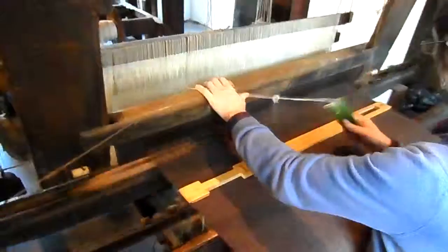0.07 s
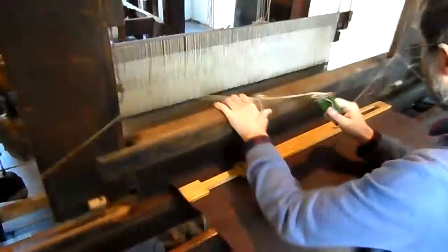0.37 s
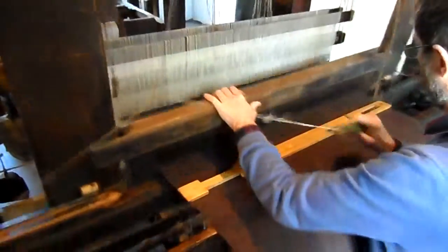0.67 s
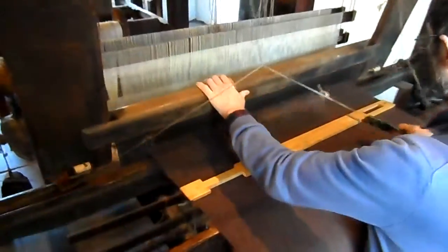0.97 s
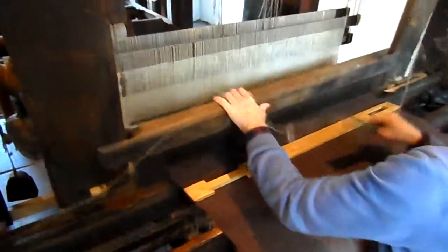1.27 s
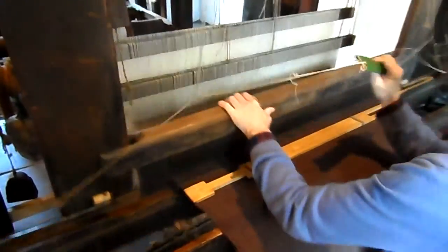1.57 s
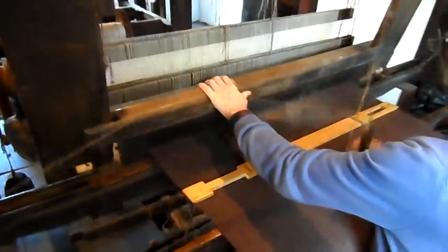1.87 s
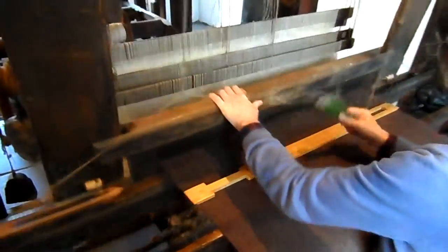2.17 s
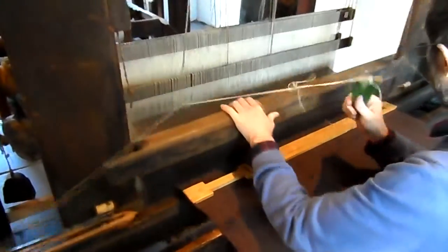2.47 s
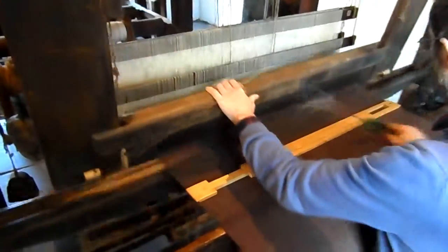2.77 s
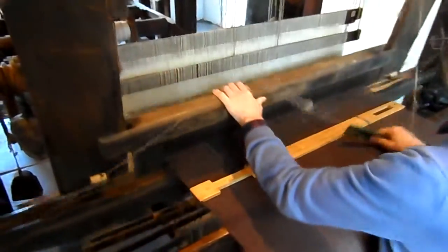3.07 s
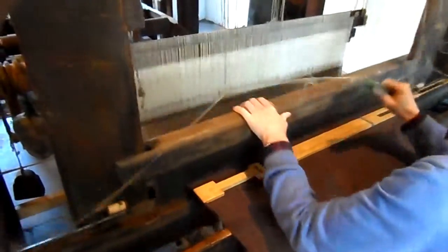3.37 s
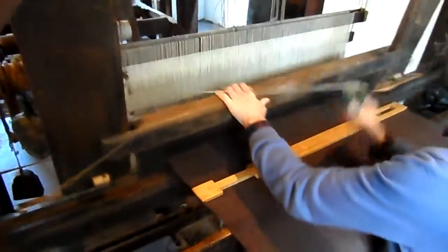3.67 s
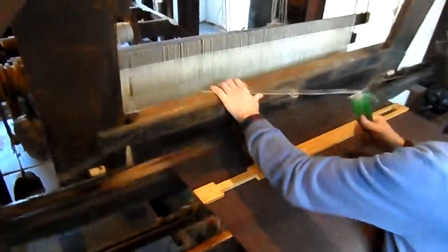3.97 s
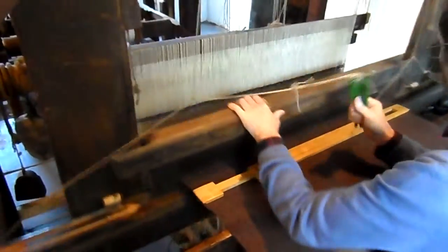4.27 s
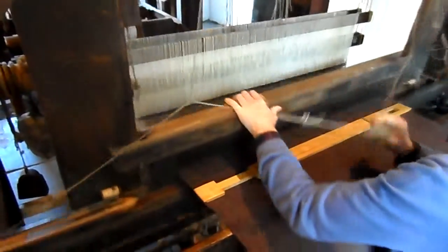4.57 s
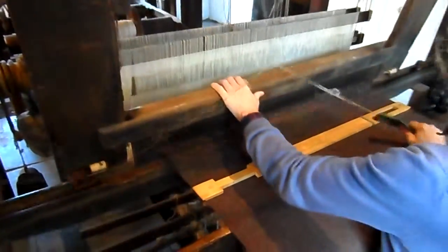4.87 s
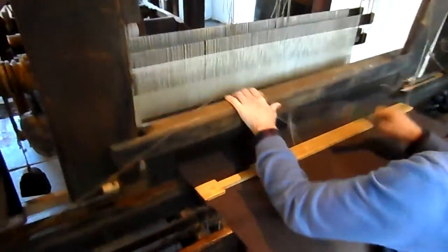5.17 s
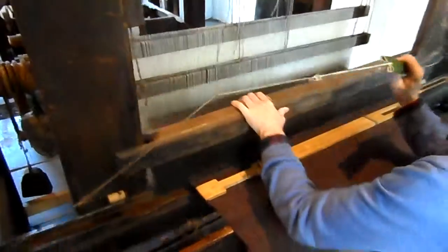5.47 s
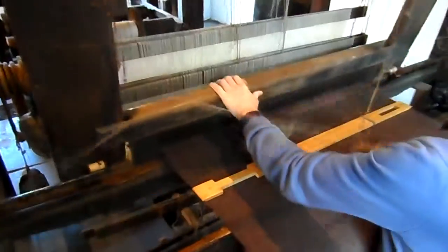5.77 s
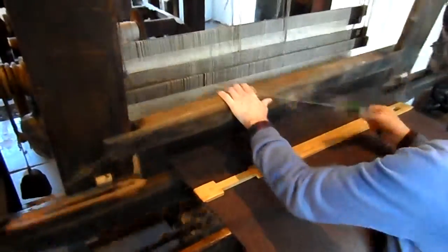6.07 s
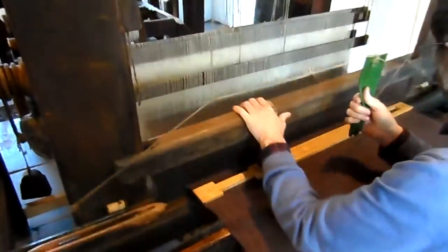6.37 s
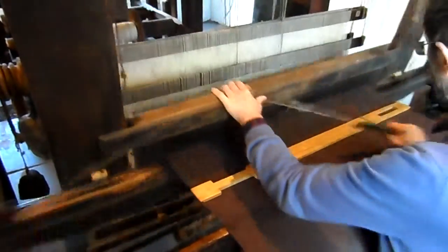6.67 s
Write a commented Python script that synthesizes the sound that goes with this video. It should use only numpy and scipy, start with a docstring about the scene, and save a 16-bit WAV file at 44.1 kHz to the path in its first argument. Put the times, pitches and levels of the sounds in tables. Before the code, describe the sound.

A wooden hand loom clacks about once a second, with thudding treadles, a sliding shuttle and brief squeaks in a small workshop.

```python
"""A small workshop, close to a wooden fly-shuttle hand loom worked about once a second.
Each cycle the treadles thud and boom through the floor, links knock and dry joints squeak.
The cord jerks the picker, the shuttle slides along its race and clacks into its box,
and the swinging beam beats the weft home. Heddles tick and threads rustle over a low room rumble."""
import sys
import numpy as np
from scipy import signal
from scipy.fft import rfft, irfft, next_fast_len
from scipy.io import wavfile
from scipy.ndimage import uniform_filter1d

SR = 44100
rng = np.random.default_rng(int(sys.argv[2]) if len(sys.argv) > 2 else 0)


def materialize(psi):
    """Save the field psi as 16-bit PCM at rate SR to the path in sys.argv[1].

    A 1-D psi becomes a single channel; in a 2-D psi each row is a channel.
    """
    bounded = np.clip(np.atleast_2d(psi).T, -1, 1)
    quanta = np.round(bounded * 32767).astype(np.int16)
    wavfile.write(sys.argv[1], SR, quanta)


N = 301203
TIME_S = np.arange(N) / SR
AGE_S = np.arange(SR // 2) / SR  # time since a blow

# room decay: f/Hz, t60/s
ROOM_DECAY = [(100, 0.65), (500, 0.48), (2500, 0.45), (6000, 0.4), (15000, 0.32)]
# spectral shapes: f/Hz, level/dB
ROOM_SPECTRUM = [(10, -4), (25, -0.5), (40, -13), (55, -2.5), (90, -11), (200, -18.5), (1000, -19.5),
                 (5000, -26), (16000, -46)]
FLOOR_SPECTRUM = [(20, -5), (38, -3), (54, -29), (70, 7), (85, -18), (130, -34), (400, -37)]
FRAME_SPECTRUM = [(40, -28.5), (90, -7), (130, -10), (180, -4), (300, -3.5), (420, -3), (650, -4.5),
                  (1200, -33.5), (4000, -69)]
RACE_SPECTRUM = [(250, -22), (600, 1), (950, 1.5), (1700, 2.5), (2800, -3.5), (4500, -13), (7000, -28),
                 (16000, -31)]
THREAD_SPECTRUM = [(1500, -26), (4000, 7), (7000, -0.5), (11000, -4.5), (14000, -6), (16000, -5.5)]
HEDDLE_SPECTRUM = [(60, -50), (400, -20), (1200, -6), (3500, 0), (7000, -4), (14000, -4), (16000, -8)]
LINK_SPECTRUM = [(88, -27), (150, -11.5), (514, -7.5), (1260, -3.5), (2360, -0.5), (3100, 0), (3620, -3.5),
                 (5150, -9), (5570, -6.5), (16000, -28.5)]
BEAM_SPECTRUM = [(80, -49), (150, -23.5), (315, -5), (500, -11), (900, 1.5), (1500, -1), (2200, 0.5),
                 (2700, -3.5), (3400, -3.5), (5000, -5), (8000, -12.5), (12000, -14.5), (16000, -23)]
BOX_SPECTRUM = [(70, -23), (120, -14.5), (430, -8.5), (750, 0.5), (1200, 1), (1900, 1.5), (2700, 2),
                (4600, -3.5), (7000, -7.5), (9000, -9), (14000, -13.5), (16000, -18.5)]
# resonances: f/Hz, width/Hz, gain/dB
FRAME_PEAKS = [(177.3, 8, 6), (402, 7.1, 2.5), (673, 25, 4), (800, 35, 0.5), (934, 43, 4), (1053, 35, 3.5),
               (1700, 73, -3)]
RACE_PEAKS = [(920, 89, 17), (1666, 48, 23)]
HEDDLE_PEAKS = [(4000, 1400, 8), (7760, 1700, 6), (13700, 720, -7)]
# ringing modes: f/Hz, level/dB, t60/s
WIRE_MODES = [(13700, -14.5, 0.11), (14900, -20, .07)]
BEAM_MODES = [(1000, -17, 0.19), (1602, 6.5, 0.024), (1846, 13, 0.015), (2250, -15, 0.027),
              (2670, 16.5, 0.017), (3040, -25, 0.028), (3550, 1, 0.023), (4080, 5.5, 0.017),
              (5710, 3.5, 0.051)]
BOX_MODES = [(637, 0.5, 0.047), (795, -2, 0.09), (940, -7, 0.045), (1090, -7, 0.036), (1300, 7.5, 0.02),
             (1590, 4, 0.022), (1900, 6, 0.04), (2620, -28, 0.11), (4600, -27, 0.077), (8220, -2, 0.034),
             (9400, -22, .05), (14200, -7, .05)]
# squeak tones by joint: f/Hz, level/dB, length/s
JOINT_TONES = {"low": [(1465, -0.5, 0.0049), (2060, -5.5, 0.016)], "middle": [(2560, -1, 0.005)],
               "high": [(3080, -4, .012), (5100, -5.5, 0.0056)], "thin": [(5190, -5.5, 0.0091)]}

# strokes of a cycle: t/s, length/s, wood level/dB, thread level/dB
PUSHES = [(0.591, 0.1, -39, -47.5), (1.62, 0.063, -39, -46.5), (2.542, 0.16, -40, -68),
          (3.51, 0.16, -39, -42.5), (4.527, 0.062, -36, -44), (5.593, 0.044, -37, -37.5),
          (6.48, .11, -40.5, -61)]  # beam pushed back
OPENINGS = [(.74, .1, -35, -43.5), (1.702, 0.13, -31, -40), (2.719, 0.095, -36, -45),
            (3.649, 0.1, -31, -40), (4.681, .04, -33.5, -43), (5.621, 0.12, -32.5, -41.5),
            (6.631, .11, -34.5, -42.5)]  # treadles open the shed
FLIGHTS = [(.99, 0.072, -31.5, -37), (1.95, 0.12, -34, -46), (2.99, 0.12, -36.5, -42),
           (3.9, 0.15, -33, -40.5), (4.93, 0.099, -30, -37), (5.86, .17, -32.5, -37.5),
           (6.83, .1, -36, -42)]  # shuttle runs
CLOSINGS = [(1.189, 0.11, -41, -47.5), (2.11, 0.025, -35, -39), (3.159, 0.089, -37.5, -40),
            (4.08, 0.047, -41.5, -40), (5.11, 0.16, -39, -41), (6.2, 0.028, -36.5, -38.5)]  # shed closes
PULLS = [(1.34, 0.17, -36, -44.5), (2.285, 0.061, -32.5, -34.5), (3.33, .13, -32.5, -35.5),
         (4.27, 0.079, -36, -42.5), (5.29, 0.09, -34, -39), (6.29, 0.061, -37, -47)]  # beam pulled to the cloth
# stroke envelopes: stroke table, rise/(dB/s), fall/(dB/s), frame level re wood/dB
STROKES = [(PUSHES, 500, 97, -5.5), (OPENINGS, 137, 150, -7), (FLIGHTS, 144, 180, -6),
           (CLOSINGS, 120, 330, -8.5), (PULLS, 183, 235, -7)]

# treadle loads and small contacts: t/s, level/dB
FLOOR_LOADS = [(.75, -45), (1.89, -44), (2.13, -41), (2.75, -42), (3.06, -38.5), (3.53, -48), (3.77, -59),
               (4.6, -40.5), (5.03, -50), (5.68, -51.5), (6.69, -40)]
FRAME_THUDS = [(.84, -21), (1.005, -16), (1.756, -23), (1.80, -18), (2.755, -20), (2.982, -19),
               (3.661, -27), (3.716, -16.5), (5.67, -16), (5.869, -25), (6.699, -37)]
HEDDLE_TICKS = [(0.631, -19.5), (0.745, -15.5), (1.0654, -11), (1.278, -21), (1.3034, -20.5), (1.3576, -16),
                (2.156, -19), (2.2536, -22), (2.2805, -14.5), (2.829, -25), (2.941, -28), (3.168, -23),
                (3.203, -19.5), (3.2877, -16.5), (4.114, -23), (4.1747, -28), (4.223, -24), (4.2612, -28),
                (4.2856, -28), (4.886, -27), (5.1848, -18.5), (5.254, -16.5), (5.2995, -17.5),
                (6.1572, -18.5), (6.1934, -21.5), (6.285, -27)]
LINK_KNOCKS = [(0.7076, -21), (0.7423, -20.5), (0.7766, -17), (1.6968, -16), (1.719, -11), (1.7662, -11.5),
               (2.6807, -24), (2.7145, -18), (2.7498, -21.5), (3.6538, -11), (3.703, -17), (4.6582, -23),
               (4.7103, -22), (5.6251, -15), (5.6794, -16.5), (6.6115, -18), (6.627, -20), (6.6773, -18)]
# joint slips: t/s, level/dB, joint
JOINT_SQUEAKS = [(.741, -25, "middle"), (0.776, -23.5, "high"), (1.718, -23, "middle"),
                 (1.764, -21, "high"), (2.68, -23.5, "low"), (2.751, -26, "middle"), (3.706, -26.5, "high"),
                 (4.708, -24, "thin"), (5.679, -24.5, "high"), (6.616, -24.5, "low"), (6.676, -26, "thin")]
# beam hits the weft: t/s, level/dB, reverb/dB, main resonance f/Hz
BEAM_BEATS = [(1.409, -15, 3, 3200), (1.42, -3.5, -0.5, 3580), (2.364, -1, -8, 2440),
              (3.367, -19, -2, 2600), (3.381, -3.5, -3.5, 3000), (3.392, -4, -5, 2400),
              (4.319, -15, -4, 2000), (4.341, -2, -6.5, 2510), (5.331, -9, -16, 3140),
              (5.348, -3, -4, 3500), (6.312, -2, -6.5, 2320)]
# picker hits the shuttle: t/s, level/dB, tilt/(dB/oct), main resonance f/Hz
PICKER_HITS = [(1.003, -9, 0, 2490), (1.016, -14.5, -3, 2070), (1.968, -12.5, 1, 2740),
               (1.973, -9.5, 1, 2810), (2.975, -10, -0.4, 1790), (2.99, -16, 1, 1210),
               (3.904, -17, 2.7, 1850), (3.918, -16.5, -1.2, 1840), (4.927, -19, 1.3, 1680),
               (5.863, -18, 0, 3900)]
# shuttle lands: t/s, level/dB, rebound level/dB, tilt/(dB/oct), main resonance f/Hz
BOX_LANDINGS = [(1.089, -9, -12, -0.9, 1500), (2.06, -9, -7.5, -1.5, 1030), (3.064, -7.5, -12.5, -.5, 1610),
                (4.014, -8, -9, 0.7, 940), (5.025, -8, -11.5, -0.5, 1030), (5.983, -10, -10.5, 2.2, 1830)]


def amp(db):
    """Decibels to gain."""
    return 10 ** (np.asarray(db) / 20)


def unit(x):
    """Scale to rms 1."""
    return x / np.sqrt(np.mean(x ** 2) + 1e-20)


def along(points, hz):
    """Interpolate (f/Hz, value) points on a log axis."""
    f, values = np.transpose(points)
    return np.interp(np.log(hz + 1), np.log(f + 1), values)


def fade(t60_s):
    """Exponential decay after a blow."""
    return np.exp(-np.log(1000) * AGE_S / max(t60_s, .001))


def burst(t60_s):
    """Decaying noise: a dense cloud of short modes."""
    return rng.standard_normal(len(AGE_S)) * fade(t60_s)


def swell(start_s, length_s, rise_db_per_s, fall_db_per_s):
    """Gain of one movement: speeds up, holds, runs out."""
    early_s = np.maximum(start_s - TIME_S, 0)
    late_s = np.maximum(TIME_S - start_s - length_s, 0)
    return amp(-np.minimum(rise_db_per_s * early_s + fall_db_per_s * late_s, 200))


def grains(rate_hz, spread_db):
    """Tiny slips of random time and size."""
    slips = (rng.random(N) < rate_hz / SR) * rng.standard_normal(N)
    return unit(slips * amp(spread_db * rng.uniform(-1.3, 1, N)))


def colour(x, spectrum, tilt_db_oct=0, peaks=()):
    """Unit-power filter from a spectrum, a tilt above 500 Hz and resonances."""
    size = 2 * next_fast_len(len(x) // 2 + 2048)
    hz = np.fft.rfftfreq(size, 1 / SR)
    level_db = along(spectrum, hz) + tilt_db_oct * np.log2(np.maximum(hz, 500) / 500)
    level_db += sum(db / (1 + (2 * (hz - f) / width) ** 2) for f, width, db in peaks)
    cepstrum = irfft(np.log(unit(amp(level_db))))
    cepstrum[1:size // 2] *= 2  # fold to minimum phase
    cepstrum[size // 2 + 1:] = 0
    return irfft(rfft(x, size) * np.exp(rfft(cepstrum)))[:len(x)]


def add(track, t_s, sound):
    """Mix a sound in at t_s."""
    part = track[max(round(t_s * SR), 0):][:len(sound)]
    part += sound[:len(part)]


def reverb(x, wet_db, build_s=0.0015):
    """Direct sound plus a diffuse room tail; treble dies first."""
    hz, t_s, bands = signal.stft(rng.standard_normal(len(AGE_S)), SR, nperseg=256)
    decay = np.exp(-np.log(1000) * t_s / along(ROOM_DECAY, hz)[:, None])
    tail = signal.istft(bands * decay, SR, nperseg=256)[1][:len(AGE_S)]
    tail *= 1 - np.exp(-AGE_S / build_s)
    return x + amp(wet_db) * signal.fftconvolve(x, tail / np.linalg.norm(tail))[:len(x)]


def room_rumble():
    """Steady low noise of the room."""
    return unit(colour(rng.standard_normal(N), ROOM_SPECTRUM))


def floor_boom(rise_db_per_s=110, fall_db_per_s=94):
    """The floor booms under the treadles."""
    load = sum(amp(db) * swell(t_s, 0, rise_db_per_s, fall_db_per_s) for t_s, db in FLOOR_LOADS)
    return load * unit(colour(rng.standard_normal(N), FLOOR_SPECTRUM))


def race_whirr(offset_s=0.03, slope_db_per_s=150):
    """Gliding shuttle and beam excite hollow tones in the race."""
    speed = sum(amp(wood_db) * swell(t_s + shift_s, length_s, slope_db_per_s, slope_db_per_s)
                for table, shift_s in [(FLIGHTS, -offset_s), (PUSHES, offset_s)]
                for t_s, length_s, wood_db, _ in table)
    return speed * unit(colour(rng.standard_normal(N), RACE_SPECTRUM, peaks=RACE_PEAKS))


def scratch(rate_hz=1500, t60_s=0.0054, spread_db=12):
    """Fine scratch of tiny pitched pings."""
    onset, pitch, size = rng.random((int(rate_hz * N / SR), 3)).T[:, :, None]
    age_s = AGE_S[:SR // 100]
    hz = 3000 + 12500 * pitch
    pings = amp(spread_db * size) * fade(t60_s)[:len(age_s)] * np.sin(2 * np.pi * hz * age_s)
    samples = (onset * N).astype(int) + np.arange(len(age_s))
    return unit(np.bincount(samples.ravel(), pings.ravel(), N)[:N])


def thread_rustle():
    """Threads snap past the reed wires, over a fine scratch."""
    snaps = signal.fftconvolve(grains(rate_hz=160, spread_db=3), burst(t60_s=.008))[:N]
    return unit(colour(unit(snaps) + scratch(), THREAD_SPECTRUM))


def stroke_gains():
    """Gains of frame, sliding wood and thread; the strongest stroke leads."""
    frame, wood, thread = np.zeros((3, N))
    for table, rise_db_per_s, fall_db_per_s, frame_db in STROKES:
        for t_s, length_s, wood_db, thread_db in table:
            speed = swell(t_s, length_s, rise_db_per_s, fall_db_per_s)
            frame = np.maximum(frame, amp(wood_db + frame_db) * speed)
            wood = np.maximum(wood, amp(wood_db) * speed)
            thread = np.maximum(thread, amp(thread_db) * speed)
    return frame, wood, thread


def rubbing():
    """The frame rumbles, wood slides on wood, the warp scrapes through heddles and reed."""
    frame, wood, thread = stroke_gains()
    rumble = frame * unit(colour(grains(rate_hz=900, spread_db=1), FRAME_SPECTRUM, peaks=FRAME_PEAKS))
    slide = wood * unit(colour(grains(rate_hz=2500, spread_db=1.5), RACE_SPECTRUM, peaks=FRAME_PEAKS))
    rustle = thread * thread_rustle()
    return reverb(amp(-4) * rumble + amp(-3) * slide + amp(-3.5) * rustle, wet_db=-1)


def frame_thuds(t60_s=0.12, rise_s=0.0077):
    """Treadles and frame take the load: cushioned blows stir only low resonances."""
    track = np.zeros(N)
    for t_s, db in FRAME_THUDS:
        push = burst(t60_s) * (1 - np.exp(-AGE_S / rise_s))
        add(track, t_s, amp(db) * reverb(colour(push, FRAME_SPECTRUM, peaks=FRAME_PEAKS), wet_db=-4))
    return track


def heddle_ticks(patter_delay_s=.02, patter_s=.15, ticks_per_move=6, detune=0.0245):
    """Heddles and cords touch, wires jingle; lighter ticks patter as the shed moves."""
    moves = [(t_s + patter_delay_s, patter_s, db) for t_s, _, _, db in CLOSINGS]
    moves += [(t_s, length_s, db) for t_s, length_s, _, db in OPENINGS]
    patter = [(t_s + length_s * (k + rng.random()) / ticks_per_move, thread_db + rng.normal(13.5, 2))
              for t_s, length_s, thread_db in moves for k in range(ticks_per_move)]
    track = np.zeros(N)
    for t_s, db in HEDDLE_TICKS + patter:
        own_peaks = [(hz, 1800, 6) for hz in rng.uniform(2500, 15500, size=3)]
        tick = colour(burst(t60_s=.022), HEDDLE_SPECTRUM, peaks=own_peaks + HEDDLE_PEAKS)
        for hz, mode_db, t60_s in WIRE_MODES:
            wire_hz = hz * (1 + detune * rng.uniform(-1, 1))
            tick += amp(mode_db) * fade(t60_s) * np.sin(2 * np.pi * wire_hz * AGE_S)
        add(track, t_s, amp(db) * tick)
    return reverb(track, wet_db=-6)


def joint_squeaks(waver=0.016):
    """A dry joint slips for milliseconds as the shed opens: one swell of unsteady tone."""
    track = np.zeros(N)
    for t_s, db, joint in JOINT_SQUEAKS:
        for hz, tone_db, length_s in JOINT_TONES[joint]:
            jitter = unit(uniform_filter1d(rng.standard_normal(len(AGE_S)), size=50))
            tone = np.sin(2 * np.pi * np.cumsum(hz * (1 + waver * jitter)) / SR)
            slip = np.sin(np.pi * np.minimum(AGE_S / length_s, 1))
            add(track, t_s, amp(db + tone_db) * reverb(slip * tone, wet_db=-7))
    return track


def link_knocks(t60_s=0.077):
    """Loose wooden links knock as the shed changes and the cord is pulled."""
    track = np.zeros(N)
    for t_s, db in LINK_KNOCKS:
        add(track, t_s, amp(db) * reverb(colour(burst(t60_s), LINK_SPECTRUM), wet_db=-3))
    return track


def clacks(blows, spectrum, modes, crack_db, crack_t60_s, ring_db):
    """Wood on wood: a crack, a short clatter, and modes struck at new strengths by each blow."""
    track = np.zeros(N)
    for t_s, db, t60_s, tilt_db_oct, wet_db, main_hz in blows:
        contact_peak = (main_hz, 0.41 * main_hz, 5)  # the contact point favours one resonance
        impact = burst(t60_s) + amp(crack_db) * burst(crack_t60_s)
        clatter = colour(impact, spectrum, tilt_db_oct, [contact_peak])
        ring = np.zeros(len(AGE_S))
        for hz, mode_db, mode_t60_s in modes:
            envelope = amp(mode_db + rng.normal(0, 2)) * fade(mode_t60_s)
            ring += envelope * np.sin(2 * np.pi * (hz * AGE_S + rng.random()))
        add(track, t_s, amp(db) * reverb(clatter + amp(ring_db) * ring, wet_db))
    return track


def beam_beats(t60_s=0.042, tilt_db_oct=0.8):
    """The swinging beam beats the weft home, at times after a first touch."""
    blows = [(t_s, db, t60_s, tilt_db_oct, wet_db, hz) for t_s, db, wet_db, hz in BEAM_BEATS]
    return clacks(blows, BEAM_SPECTRUM, BEAM_MODES, crack_db=4, crack_t60_s=.0075, ring_db=-17)


def shuttle_clacks(pick_t60_s=0.096, pick_wet_db=-2, box_t60_s=0.06, box_wet_db=-7, rebound_s=.0067):
    """The picker throws the shuttle; it lands in the far box and rebounds once, brighter."""
    blows = [(t_s, db, pick_t60_s, tilt, pick_wet_db, hz) for t_s, db, tilt, hz in PICKER_HITS]
    for t_s, db, rebound_db, tilt, hz in BOX_LANDINGS:
        blows.append((t_s, db, box_t60_s, tilt, box_wet_db, hz))
        blows.append((t_s + rebound_s, rebound_db, box_t60_s, tilt + 3, box_wet_db, hz))
    return clacks(blows, BOX_SPECTRUM, BOX_MODES, crack_db=0, crack_t60_s=0.027, ring_db=-12)


def scene():
    """Room and loom, mono."""
    background = amp(-47) * room_rumble() + amp(-1) * floor_boom()
    movement = amp(-9) * race_whirr() + rubbing() + amp(-9) * frame_thuds()
    small_parts = amp(-7.5) * heddle_ticks() + amp(5) * joint_squeaks() + amp(-7) * link_knocks()
    blows = amp(-10) * beam_beats() + amp(-7.5) * shuttle_clacks()
    return (background + movement + small_parts + blows)[None]


def record(dry, ceiling=0.39, hardness=5, start_s=.571, cutoff_hz=15900):
    """Soft-clip, mute until start_s, low-pass."""
    rounded = dry / (1 + np.abs(dry / ceiling) ** hardness) ** (1 / hardness)
    low_pass = signal.ellip(12, .1, 90, cutoff_hz, fs=SR, output="sos")
    return signal.sosfilt(low_pass, rounded * (TIME_S > start_s))


dry = scene()
out = record(dry)
materialize(out)
```